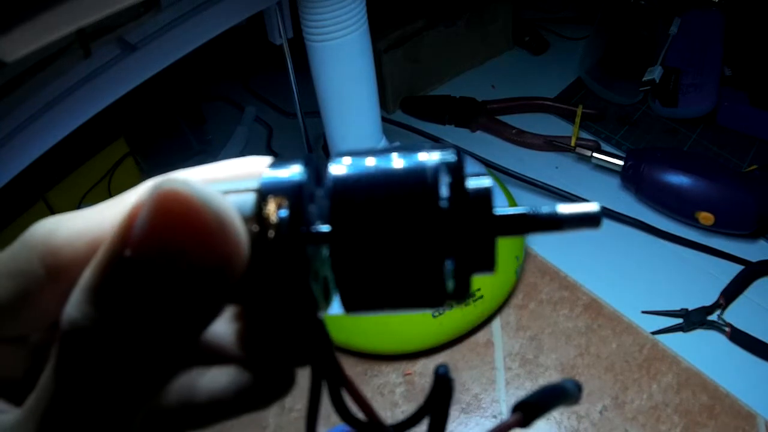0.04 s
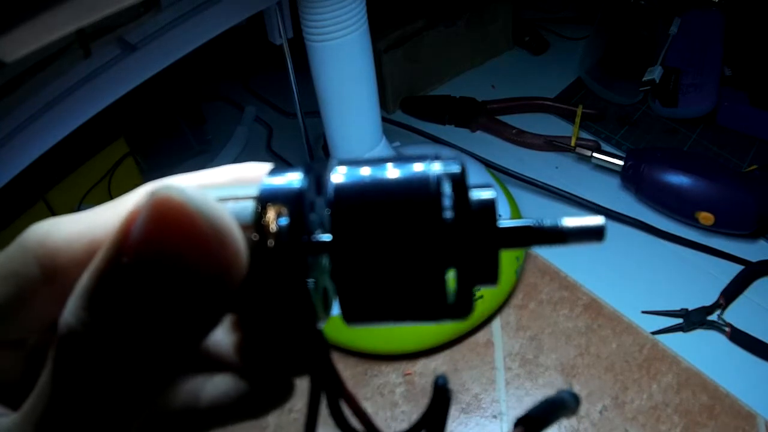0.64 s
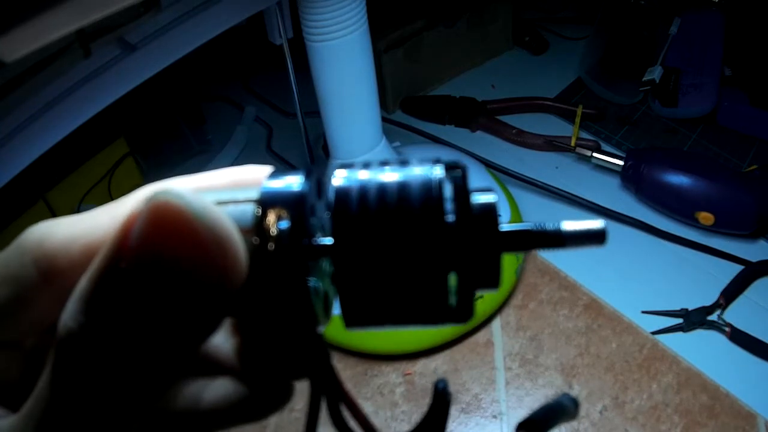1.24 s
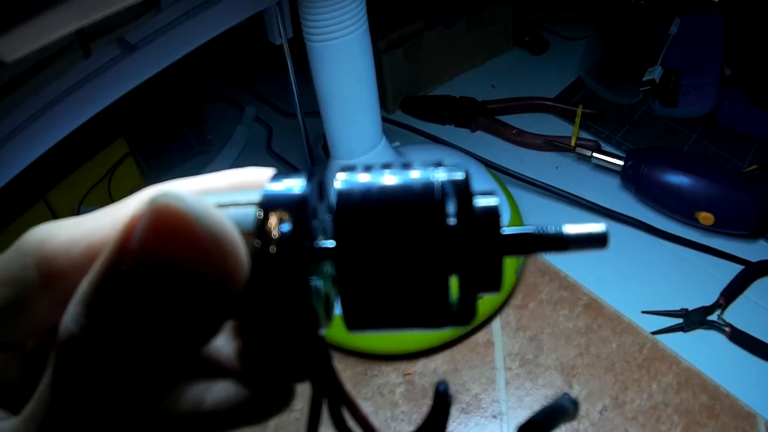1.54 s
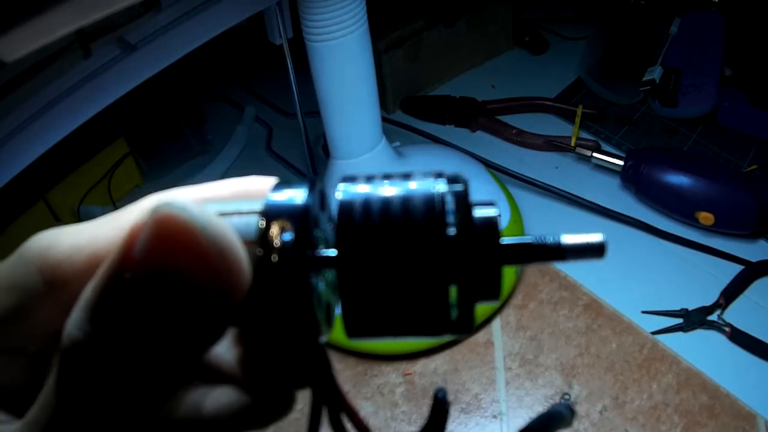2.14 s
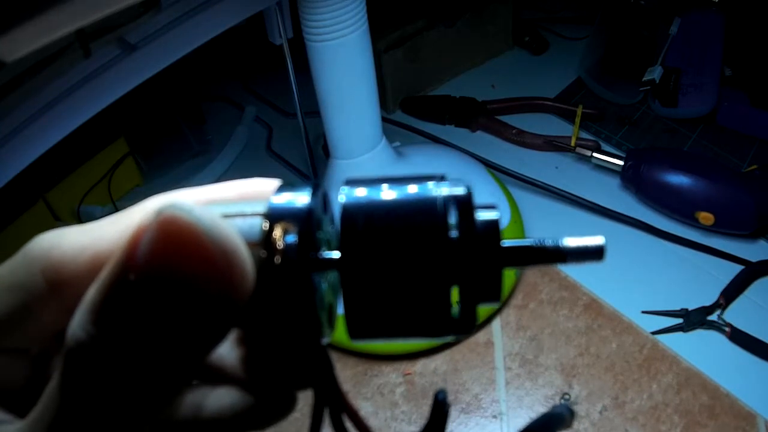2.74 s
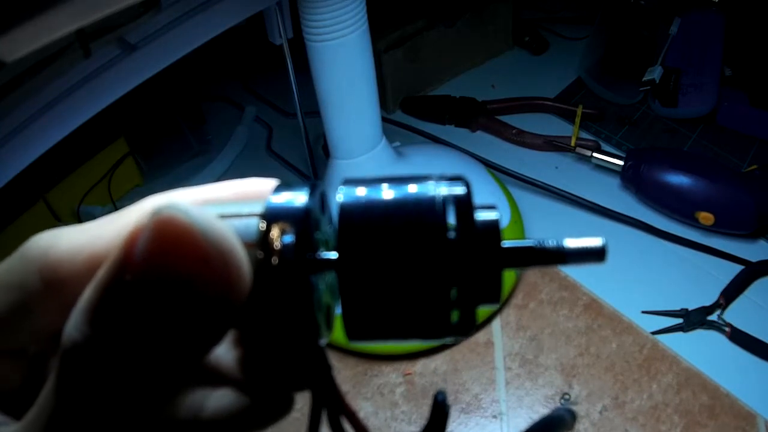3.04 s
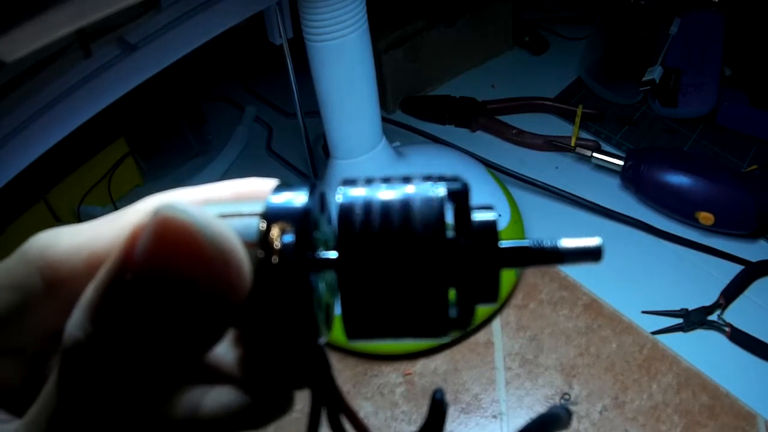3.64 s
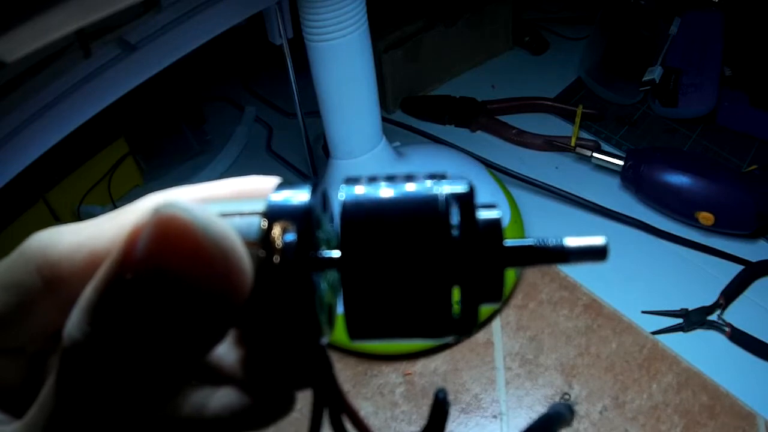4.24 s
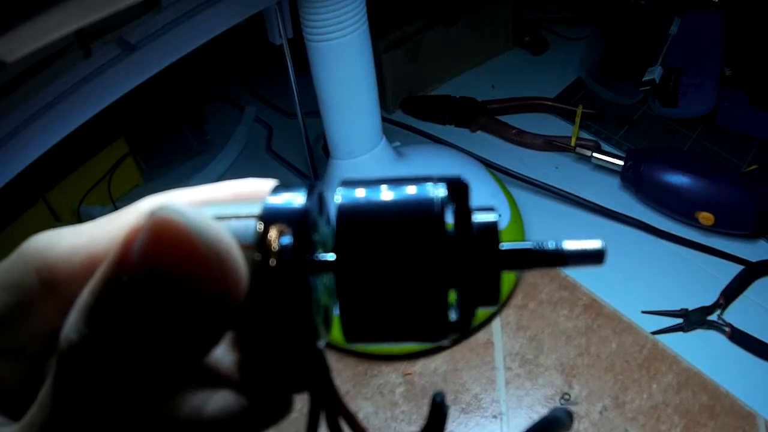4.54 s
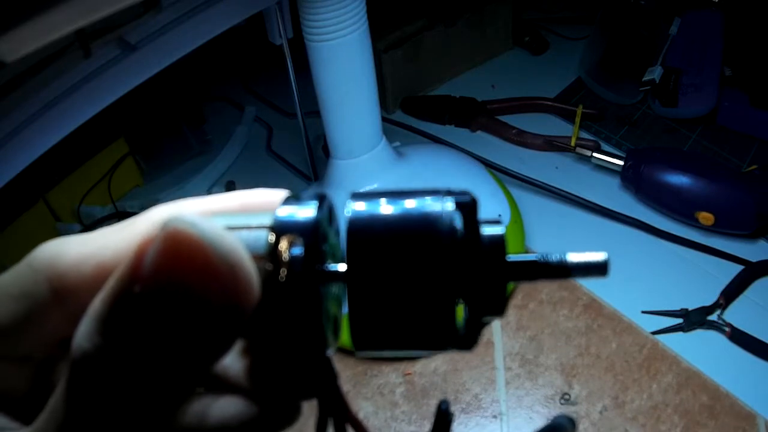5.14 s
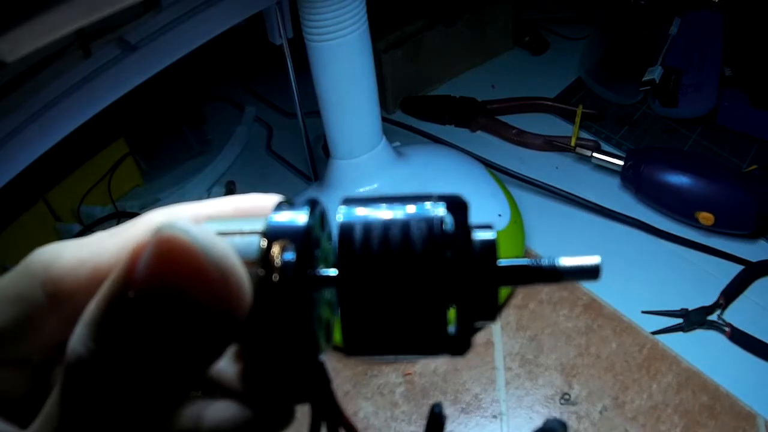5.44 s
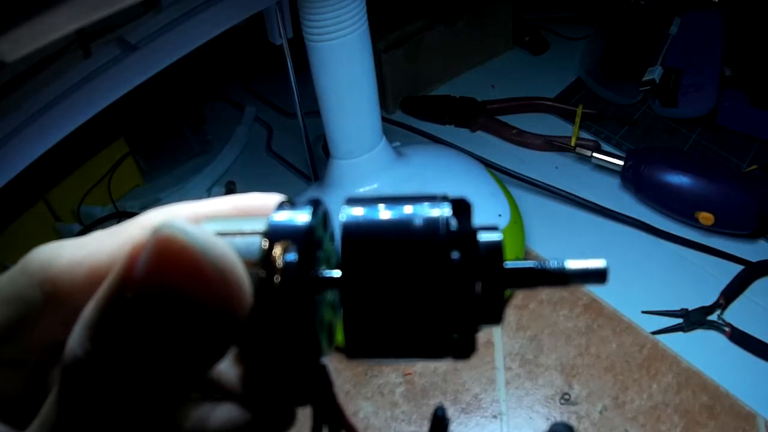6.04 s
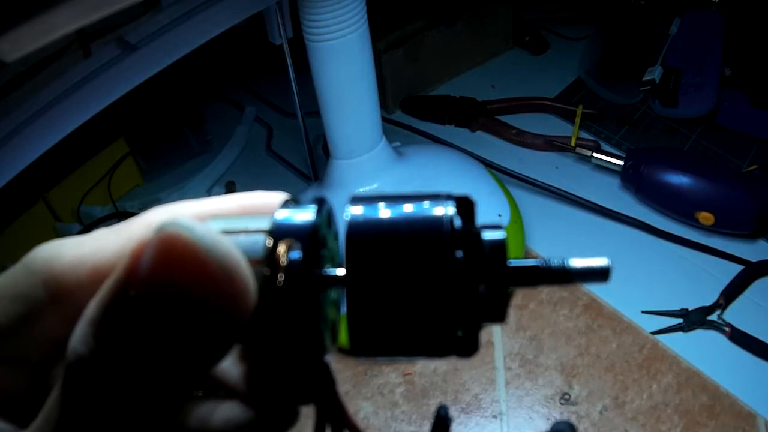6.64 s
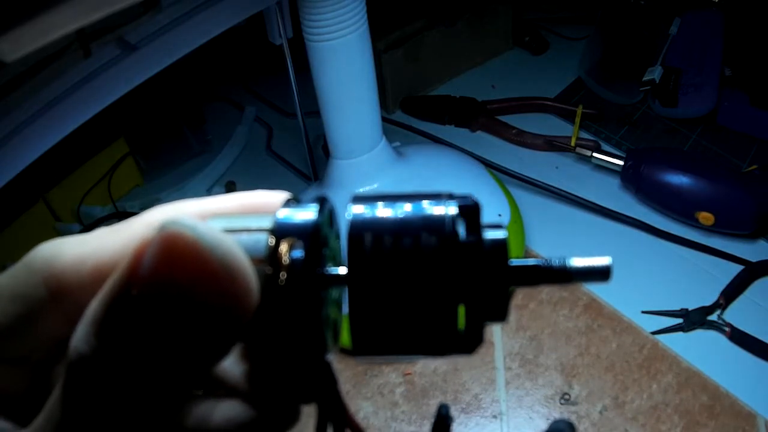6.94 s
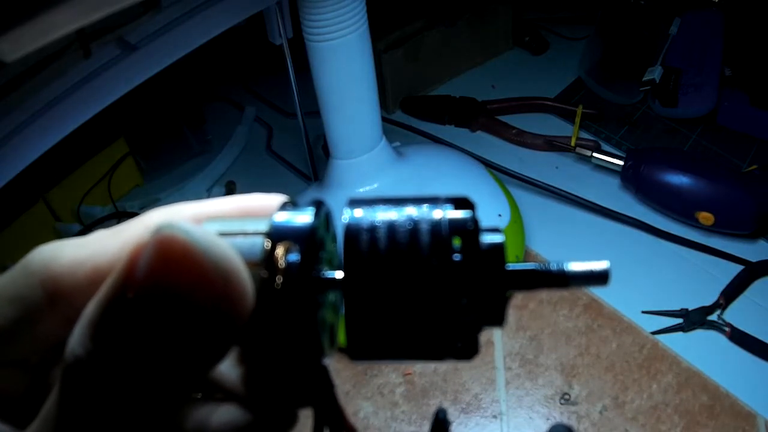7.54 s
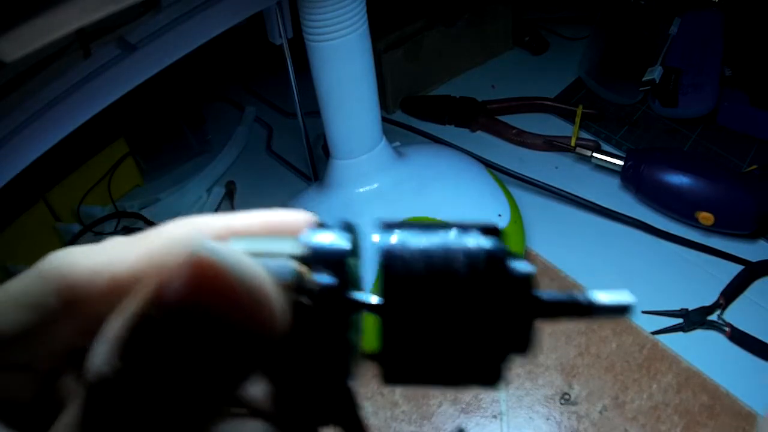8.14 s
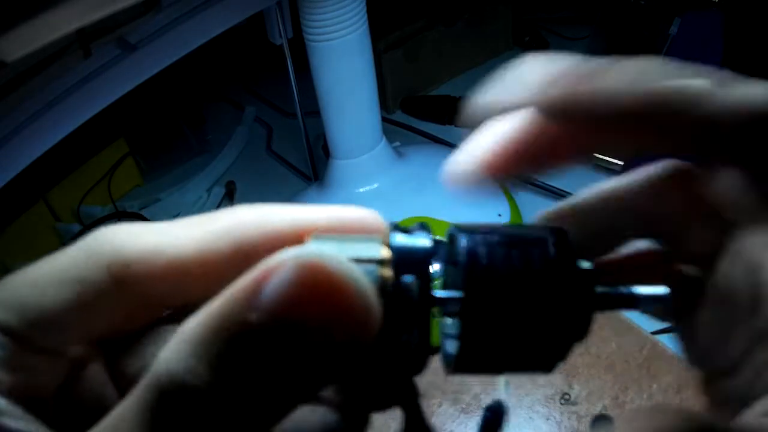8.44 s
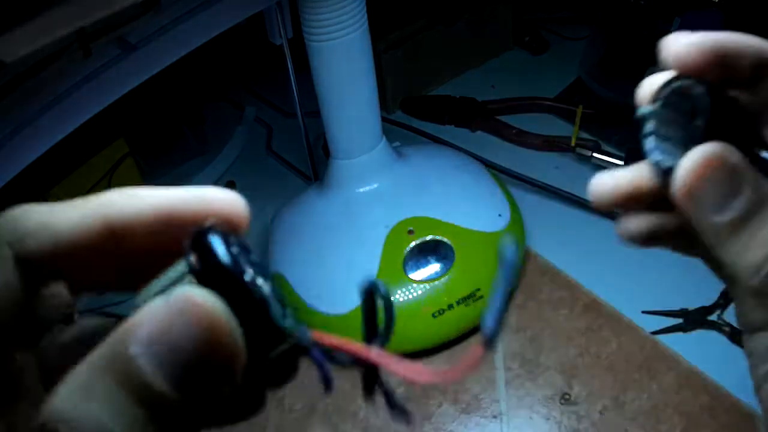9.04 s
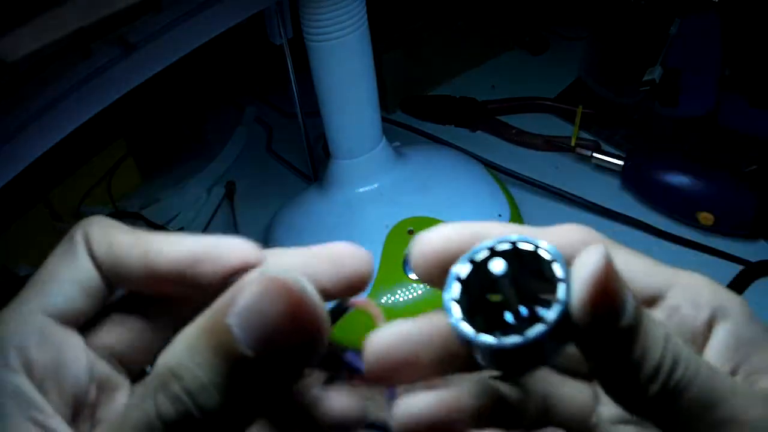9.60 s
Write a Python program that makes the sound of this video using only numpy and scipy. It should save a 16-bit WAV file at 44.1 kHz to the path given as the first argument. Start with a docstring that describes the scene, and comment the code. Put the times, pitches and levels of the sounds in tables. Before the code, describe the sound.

Close up in a quiet room, the worn bearing of a small hand-turned motor rumbles and rasps, with brief swells of low hum. The grinding dies down, returns as a steadier throb as the rotor gathers speed, and fades again. Metal parts click a few times as the motor comes apart, leaving faint hums over a soft hiss and a thin, intermittent electrical whine.

```python
"""At a workbench, one microphone close to a small hand-held motor with a worn bearing. The loose rotor knocks
and grinds in a rough rumble that swells and hums, settles into a throb once a turn as it gathers speed, then
fades. The rotor is pulled off with a few metal clicks; faint swells and hums linger. Behind it all lie the
room's low murmur, a soft hiss and a faint thin whine once a second."""
import sys
import numpy as np
from scipy import signal
from scipy.fft import rfft, irfft, next_fast_len
from scipy.io import wavfile
from scipy.ndimage import uniform_filter1d

SR = 44100
rng = np.random.default_rng(int(sys.argv[2]) if len(sys.argv) > 2 else 0)


def int16_out(signal):
    """Quantize to a 16-bit WAV file."""
    q = np.round(np.clip(np.atleast_2d(signal).T, -1, 1) * 32767)
    wavfile.write(sys.argv[1], SR, q.astype(np.int16))


N = 435266
TIME = np.arange(N) / SR
FFT_SIZE = next_fast_len(N + 4096)
FREQS = np.fft.rfftfreq(FFT_SIZE, 1 / SR)
USUAL_KNOCK_DB, USUAL_PRESSURE_DB, USUAL_TURNS_PER_S = -33, -50, 17.2

# how the rotor runs: (time [s], share of the rumble that repeats every turn [0-1], knock hardness [dB])
ROTOR_RUN = [(0, 0.32, -2), (1.6, 0, -5), (2.2, 0.35, -2.5), (2.9, 0.17, -1.5), (3.5, .2, -3),
             (4.05, 0.9, -6), (5.6, 0.97, -3.5), (6.9, 0.97, -6), (7.3, 0.68, -10.5), (7.95, .85, -12),
             (8.15, 0.03, -11), (9.1, 0.02, -5)]


def rumble(speed, turns, far_side_turns=0.53, hum_width_hz=3.8, hum_share=0.18):
    """The loose rotor knocks from side to side and rolls over pits; both shake the low resonances."""
    # the motor's lowest resonances: (pitch [Hz], width [Hz], relative level [dB])
    thud_modes = [(61, 11, -5), (87, 17, -9), (109.16, 17.3, 5)]
    # its middle resonance: (pitch [Hz], width in a random shudder [Hz], relative level [dB])
    drone_modes = [(152.4, 25.8, 0)]
    # its upper resonances: (pitch [Hz], width [Hz], relative level [dB])
    growl_modes = [(225.3, 40, -6), (293.4, 57, -7.5), (317.5, 34, 0.5), (371.7, 58, -6)]
    knock_db, pressure_db, lift_db = level_curves()
    regular, hardness_db = curves(ROTOR_RUN)
    extra_pressure_db = pressure_db - USUAL_PRESSURE_DB
    speed_octaves = np.log2(speed / USUAL_TURNS_PER_S)
    body_db = 10 * speed_octaves
    growl_db = (-45.7 + 0.73 * (knock_db - USUAL_KNOCK_DB) + 0.38 * extra_pressure_db
                + 0.4 * hardness_db + 3 * regular + 0.79 * lift_db + 2 * speed_octaves)
    # the faster the rotor turns, the more of each knock lands on the far side of the play
    far_share = np.clip(0.13 + 0.51 * (speed / 19.4) ** 8.7, 0, 1)

    def sway(lag_turns):
        """Two knocks a turn, one on each side of the play."""
        angle = turns - lag_turns
        return (1 - far_share) * knocks(angle) + far_share * knocks(angle - far_side_turns)

    def shaken(repeating, modes, level_db, loose, pitched, even_s):
        """Blends the repeating motion with a random shudder that can settle on the strongest mode."""
        share = regular * (1 - loose)
        hum = steady(resonate(noise(), [(strongest_hz(modes), hum_width_hz, 0)]), 0.065)
        rough = steady(resonate(noise(), modes), 0.076)
        shudder = np.sqrt(pitched) * hum + np.sqrt(1 - pitched) * rough
        motion = np.sqrt(share) * steady(repeating, 0.3) + np.sqrt(1 - share) * shudder
        return amp(level_db) * steady(motion, even_s)

    thud = resonate(sway(-0.01), thud_modes, late_s=0.0082)
    drone = resonate(sway(0.1304), [(hz, 0.59 * width, db) for hz, width, db in drone_modes])
    growl = resonate(race(turns), growl_modes) + 0.67 * resonate(sway(0.2008), growl_modes)
    growl = shaken(growl, growl_modes, growl_db + body_db, loose=0.03, pitched=0, even_s=0.13)
    growl = brighten(growl, edge_hz=285, db=-body_db)  # only the low side keeps the added body
    growl = brighten(growl, edge_hz=372, db=0.71 * extra_pressure_db)
    thud = shaken(thud, thud_modes, knock_db, loose=0.002, pitched=hum_share, even_s=0.063)
    drone_db = knock_db + hardness_db
    drone = shaken(drone, drone_modes, drone_db, loose=0.0059, pitched=hum_share, even_s=0.14)
    return thud + drone + growl


def level_curves(loud_rub_db=-45, quiet_range_db=7.5, rasp_lag_s=0.03):
    """Knock, pressure and the lift of the swells, in dB; a swell adds most rasp to quiet rubbing."""
    # how hard the loose rotor knocks in its play, swells aside: (time [s], level [dB])
    knocking = [(0, -27.5), (.9, -35.5), (1.55, -36.5), (1.85, -39), (2.6, -42.5), (3.25, -43.5),
                (3.45, -38.5), (3.98, -40), (4.42, -32), (4.78, -41.5), (5.1, -34), (5.58, -31.5),
                (6.02, -36.5), (6.45, -32), (7.92, -34.5), (8.06, -39.5), (8.5, -39), (8.75, -48.5)]
    # how hard the bearing rubs, swells aside: (time [s], level [dB])
    rubbing = [(0, -40), (.8, -44), (1.75, -46), (1.9, -53), (2.7, -58), (3.45, -54), (3.95, -59),
               (4.4, -48.5), (4.78, -59), (5.15, -51), (5.5, -50.5), (5.8, -45.5), (6.05, -51.5),
               (6.5, -49.5), (7.75, -52), (8.05, -55.5), (8.6, -53), (8.8, -59.5)]
    # brief swells of low growl and rasp, some lingering after the motor stops:
    # (middle [s], length [s], lift [dB])
    swells = [(0.085, 0.072, -1), (0.417, .14, 6), (.75, 0.27, 7), (1.027, 0.17, 10.5), (1.332, 0.13, 7.5),
              (1.652, .14, 5), (2.032, 0.086, 2), (2.172, .16, 5), (2.345, 0.14, 5.5), (2.82, 0.14, 6),
              (2.98, 0.19, 7.5), (3.14, 0.13, 6), (3.38, 0.28, 5), (8.17, .2, 5.5), (8.405, 0.16, 4),
              (9.172, 0.3, 5), (9.466, 0.16, 6.5), (9.768, 0.18, 6)]
    (knock_db,), (pressure_db,) = curves(knocking), curves(rubbing)
    lift_db = np.zeros(N)
    for s, length, db in swells:
        add(lift_db, s - length / 2, db * np.hanning(int(length * SR)))
    quietness = np.clip((loud_rub_db - pressure_db) / quiet_range_db, 0, 1)
    rasp_db = 0.9 * quietness * np.interp(TIME - rasp_lag_s, TIME, lift_db)
    return knock_db + 0.29 * lift_db, pressure_db + rasp_db, lift_db


def knocks(turns):
    """A downward push each time the rotor completes a turn."""
    return -np.diff(np.floor(turns), prepend=np.floor(turns[0]))


def race(turns, points=256, drift_hz=0.1252):
    """The pitted track of the bearing: one random profile, met again every turn as it slowly shifts."""
    first, second = rng.standard_normal((2, points))
    position = (turns * points).astype(int) % points
    drift = 2 * np.pi * drift_hz * TIME
    return first[position] * np.cos(drift) + second[position] * np.sin(drift)


def humming(taper=0.56, wander_hz=2.3, wander_s=0.065):
    """A low resonance swells into a hum and dies away on one slightly wandering pitch."""
    # low hums that swell and fade, the last ones lingering in the room:
    # (start [s], length [s], pitch [Hz], level [dB])
    hums = [(0, 0.28, 155.8, -29), (.32, 0.22, 152, -33), (.58, 0.29, 148.7, -30.5), (1.1, .12, 150.6, -36),
            (1.119, 0.56, 111.8, -32), (1.28, .12, 155, -36), (2.74, 0.18, 153.2, -37.5),
            (2.92, 0.15, 150.5, -34.5), (3.08, 0.13, 151, -36), (3.3, 0.33, 65.8, -44),
            (8.16, 0.12, 150.6, -40.5), (8.33, .17, 110.2, -34.5), (9.0, 0.36, 109.2, -42),
            (9.401, 0.12, 108.5, -41.5), (9.709, .14, 108.2, -44.5)]
    out = np.zeros(N)
    wander = unit(uniform_filter1d(noise(), int(wander_s * SR)))
    for s, length, hz, db in hums:
        count = int(length * SR)
        pitch_hz = hz + wander_hz * np.roll(wander, -round(s * SR))[:count]
        cycles = rng.random() + np.cumsum(pitch_hz) / SR
        add(out, s, amp(db) * unit(np.sin(2 * np.pi * cycles)) * signal.windows.tukey(count, taper))
    return out


def grinding(turns, throb_db=0.5, grain_db=-1.5, grains_per_s=3500):
    """Countless tiny contacts of balls and grit, pressed harder once a turn."""
    # midrange of the rubbing bearing: (frequency [Hz], relative level [dB])
    grind_spectrum = [(250, -24), (430, 1), (520, -0.5), (700, 2), (1000, -3.5), (1550, -0.5), (1900, -4.5),
                      (2500, -13), (3500, -24), (6000, -47)]
    # its gritty treble: (frequency [Hz], relative level [dB])
    fizz_spectrum = [(1500, -30), (2600, 0), (3200, -0.5), (3950, 2), (4700, -4), (5700, -5.5),
                     (6700, -10.5), (7800, -8), (8700, -12), (9700, -8.5), (11000, -16.5), (12500, -10.5),
                     (15500, -25)]
    _, pressure_db, _ = level_curves()
    regular, _ = curves(ROTOR_RUN)
    fizz_db = -63.5 + (pressure_db - USUAL_PRESSURE_DB) + 2 * regular
    turn_db = throb_db * np.cos(2 * np.pi * (turns - 0.1))
    grit = noise() * (rng.random(N) < grains_per_s / SR)
    grit *= amp(grain_db * np.minimum(rng.exponential(1, N), 3))
    grind = amp(pressure_db + turn_db - 2) * colour(noise(), grind_spectrum)
    fizz = amp(fizz_db + turn_db) * colour(unit(grit) + noise(), fizz_spectrum)
    return grind + fizz


def scrapes(taper=0.7):
    """A ball skids for a moment and sets the steel hissing at one pitch."""
    # skids in the bearing: (start [s], length [s], pitch [Hz], width [Hz], level [dB])
    skids = [(0.175, 0.13, 4000, 900, -54), (0.329, 0.32, 4050, 450, -61.5), (1.33, 0.27, 4000, 250, -67),
             (4.983, 0.71, 4100, 700, -68), (5.501, 0.29, 4900, 700, -68), (5.7, 0.36, 5100, 1000, -69),
             (6.37, 0.25, 4620, 1000, -64), (7.376, 0.65, 2660, 70, -72), (7.59, .14, 4054, 700, -68)]
    out = np.zeros(N)
    for s, length, hz, width, db in skids:
        count = int(length * SR)
        hiss = resonate(noise(), [(hz, width, 0)])[:count]
        add(out, s, amp(db) * hiss * signal.windows.tukey(count, taper))
    return out


def clicks(tick_s=0.0018, focus_db=20):
    """Metal parts touch: a dry tick and a short ring reach the microphone, then the room answers."""
    # touches: (time [s], level [dB], tick centre [Hz], ringing share [0-1], ring cutoff [Hz], room [dB])
    touches = [(8.154, -31, 3900, 0.28, 3900, -3.5), (8.5648, -32, 3840, 0.3, 4000, -2.5),
               (8.687, -20.5, 6070, 0.9, 16000, -16.5), (8.895, -44, 11000, 0.23, 16000, -8),
               (8.9065, -42.5, 10500, 0.04, 16000, -7), (8.912, -49, 11000, 0, 16000, -8)]
    # modes of the metal: (pitch [Hz], relative level [dB], time to fall 60 dB [s])
    metal_modes = [(3350, -17, 0.031), (3820, -11.5, 0.057), (4300, -11, 0.024), (5600, -8, .008),
                   (5780, 7.5, 0.019), (7850, -27, .012), (9650, -13, 0.013), (12700, -22, .01),
                   (13740, -3, 0.013), (14700, -18, .008)]
    out, t = np.zeros(N), np.arange(SR // 3) / SR
    hz = np.fft.rfftfreq(len(t), 1 / SR) + 1
    for s, db, centre_hz, ringing, top_hz, room_db in touches:
        # a soft touch cannot reach the high modes
        ring = sum(amp(mode_db - 60 * t / t60) * np.sin(2 * np.pi * mode_hz * t)
                   / (1 + (mode_hz / top_hz) ** 10) for mode_hz, mode_db, t60 in metal_modes)
        band = amp(-np.minimum(focus_db * np.log2(hz / centre_hz) ** 2, 19))
        tick = irfft(rfft(rng.standard_normal(len(t))) * band, len(t)) * np.exp(-t / tick_s)
        direct = ringing * ring / abs(ring).max() + (1 - ringing) * tick / abs(tick).max()
        reflected = signal.fftconvolve(direct, room_tail(t))[:len(t)]
        add(out, s, amp(db) * (direct + amp(room_db) * reflected))
    return out


def room_tail(t, low_t60_s=0.2, treble_t60_s=0.088, split_hz=7000, gap_s=0.006):
    """The room's reflections arrive just behind the direct sound, their treble dying first."""
    filters = [signal.butter(4, split_hz, side, fs=SR, output="sos") for side in ("low", "high")]
    low, high = (signal.sosfilt(sos, rng.standard_normal(len(t))) for sos in filters)
    tail = low * amp(-60 * t / low_t60_s) + 0.7 * high * amp(-60 * t / treble_t60_s)
    tail *= (t > gap_s) * (1 + np.exp(-t / 0.014))  # stronger early reflections
    return tail / np.linalg.norm(tail)


def whine(buzz_hz=327.29, length_s=0.23, ramp_s=0.004):
    """Thin high harmonics of a buzz, sounding briefly once a second."""
    # partials of the buzz: (harmonic [number], relative level [dB])
    partials = [(27, -9), (28, -11), (29, -0.5), (30, 2), (31, -13), (32, -7), (35, -4), (37, -5), (38, 1),
                (39, -3), (41, -13), (42, -6)]
    # the buzz switches on: (start [s], level [dB])
    bursts = [(-.015, -64.5), (.982, -63.5), (1.985, -68), (2.984, -67), (3.986, -68.5), (4.985, -68),
              (5.984, -67), (6.981, -66), (7.984, -68), (8.975, -69.5)]
    tone = unit(sum(amp(db) * np.cos(2 * np.pi * (k * buzz_hz * TIME + rng.random()))
                    for k, db in partials))
    gate = sum(amp(db) * np.clip(np.minimum(TIME - s, s + length_s - TIME) / ramp_s, 0, 1)
               for s, db in bursts)
    return tone * gate


def room_tone(hiss_db=-55.5, tones_db=-63.5, murmur_db=-52):
    """All around the bench: steady hiss with a few fuzzy tones over a low murmur."""
    # hiss of the room: (frequency [Hz], relative level [dB])
    hiss_spectrum = [(120, -43), (200, 2.5), (249, -20), (293, 3), (407, -11.5), (555, -4), (716, -6.5),
                     (770, -4), (1030, -5.5), (1910, -10), (3190, -26), (3490, -18.5), (5610, -28.5),
                     (13700, -30.5), (15600, -33)]
    # its faint steady tones: (pitch [Hz], width [Hz], relative level [dB])
    tones = [(613, 21, -3.5), (706, 20, -0.5), (912, 17, -1), (1202, 11, 2.5)]
    # its low murmur: (pitch [Hz], width [Hz], relative level [dB])
    murmur = [(24, 22, -3), (60, 24, 2)]
    return (amp(hiss_db) * colour(noise(), hiss_spectrum)
            + amp(tones_db) * resonate(noise(), tones)
            + amp(murmur_db) * resonate(noise(), murmur))


def amp(db):
    """Decibels to gain."""
    return 10 ** (np.asarray(db) / 20)


def unit(x):
    """Scales to rms 1."""
    return x / np.sqrt(np.mean(x ** 2) + 1e-20)


def noise():
    """White noise."""
    return rng.standard_normal(N)


def add(mix, s, sound):
    """Mixes a sound in at time s."""
    part = mix[max(round(s * SR), 0):][:len(sound)]
    part += sound[:len(part)]


def curves(rows):
    """Each column after the time as a curve over all samples."""
    s, *columns = np.transpose(rows)
    return [np.interp(TIME, s, column) for column in columns]


def colour(x, points):
    """Filters x by a curve drawn through (Hz, dB) points."""
    hz, db = np.transpose(points)
    shape = amp(np.interp(np.log(FREQS + 1), np.log(hz), db))
    return unit(irfft(rfft(x, FFT_SIZE) * shape, FFT_SIZE)[:N])


def strongest_hz(modes):
    """Pitch of the loudest resonance."""
    return max(modes, key=lambda mode: mode[2])[0]


def resonate(x, modes, late_s=0):
    """Passes x through steep-sided resonances, delayed by late_s per octave above the strongest."""
    shape = sum(amp(db) / (1 + (2 * (FREQS - hz) / width) ** 2) for hz, width, db in modes)
    delay = late_s * np.log2((FREQS + 1) / strongest_hz(modes))
    phase = 2 * np.pi * np.cumsum(delay) * FREQS[1]
    return unit(irfft(rfft(x, FFT_SIZE) * shape * np.exp(-1j * (phase - phase.min())), FFT_SIZE)[:N])


def steady(x, seconds):
    """Evens out the swells of x that are slower than the given time."""
    size = max(int(seconds * SR), 2)
    power = uniform_filter1d(uniform_filter1d(x ** 2, size), size)
    return x / np.sqrt(abs(power) + 1e-6)


def brighten(x, edge_hz, db, order=8):
    """Raises or lowers the part of x above an edge by the curve db."""
    low = signal.sosfiltfilt(signal.butter(order, edge_hz, fs=SR, output="sos"), x)
    return low + amp(db) * (x - low)


def scene():
    """The motor and its clicks up close, low hums around them, whine and room tone behind, in mono."""
    # how fast the rotor spins: (time [s], speed [turns/s])
    rotor_speed = [(0.0, 10.11), (1.8, 15.16), (2.4, 12.92), (3.2, 13.53), (3.75, 12.27), (4.0, 10.3),
                   (4.3, 15.64), (4.55, 15.42), (4.75, 12.76), (4.95, 14.19), (5.15, 16.2), (5.4, 16.52),
                   (5.7, 17.58), (6.1, 17.76), (6.6, 18.3), (7.0, 18.63), (7.4, 19.34), (8.0, 19.47)]
    speed, = curves(rotor_speed)
    turns = np.cumsum(speed) / SR
    foreground = rumble(speed, turns) + humming() + grinding(turns) + scrapes() + clicks()
    return (foreground + whine() + room_tone())[None]


def record(dry):
    """The recorder behind the microphone cuts off the highest treble."""
    edge_hz = 15700
    lowpass = signal.firwin(511, edge_hz, window=("kaiser", 9), fs=SR)
    return signal.oaconvolve(dry, lowpass[None], "same")


dry = scene()
out = record(dry)
int16_out(out)
```